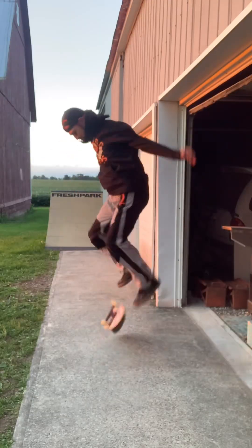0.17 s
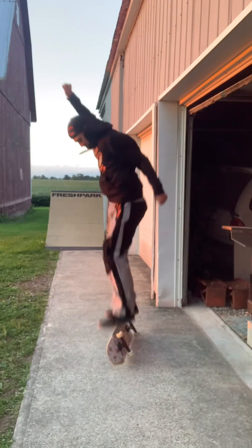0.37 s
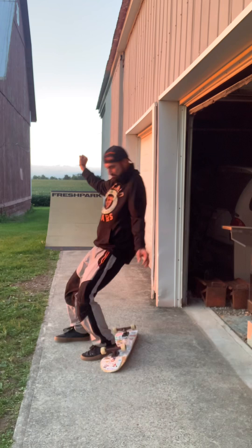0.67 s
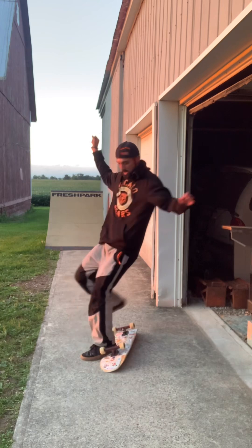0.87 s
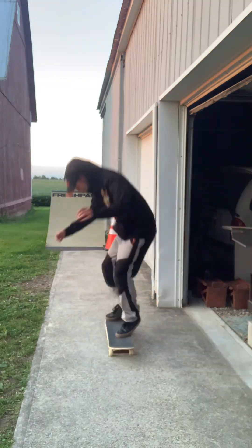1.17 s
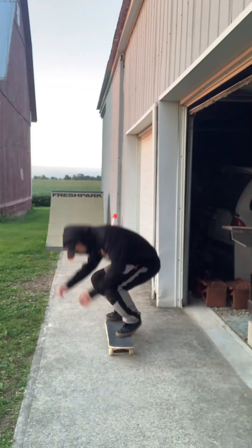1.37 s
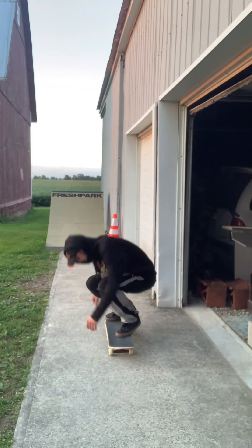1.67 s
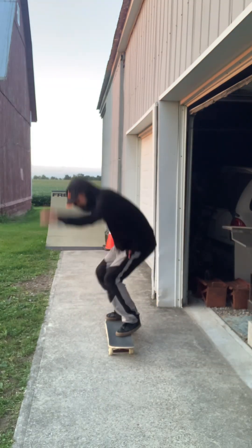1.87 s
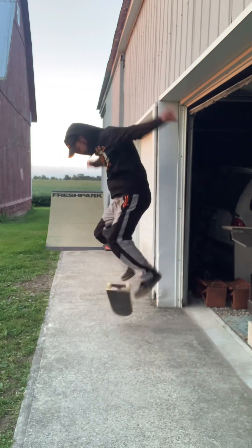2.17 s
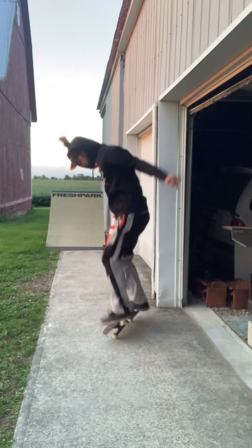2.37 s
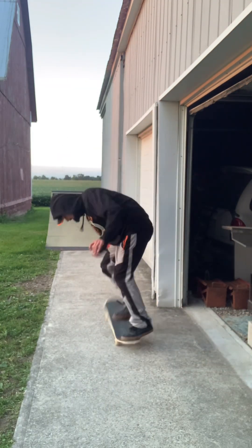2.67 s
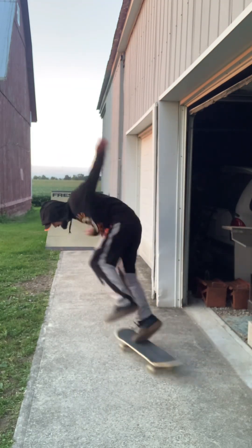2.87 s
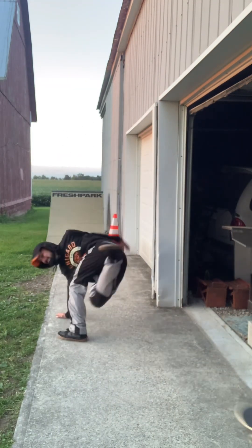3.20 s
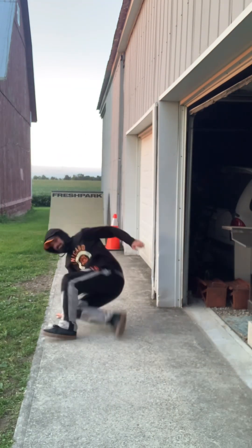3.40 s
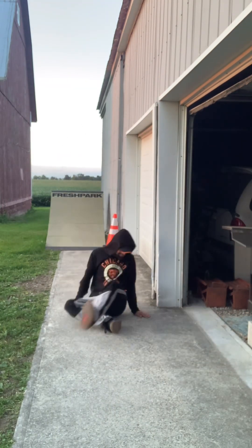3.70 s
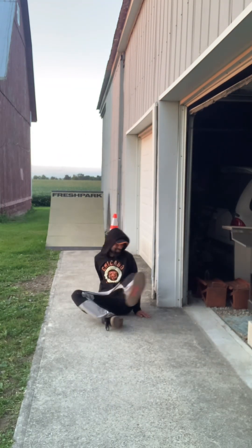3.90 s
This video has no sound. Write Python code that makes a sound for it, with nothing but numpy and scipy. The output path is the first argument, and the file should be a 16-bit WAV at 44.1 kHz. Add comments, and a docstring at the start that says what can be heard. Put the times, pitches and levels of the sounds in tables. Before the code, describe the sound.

Two skateboard flip attempts: sharp wooden cracks and clatter on concrete, a pause between, then a scraping skid, body thumps and faint cloth rustle.

```python
"""Skateboard tricks by a garage

A skateboarder tries two flip tricks on concrete: tail pops, scraping shoes, a clattering board, whirring wheels.
The second time the board shoots away and crashes, and the rider tumbles to the ground.
Blows are damped resonances and noise bursts; rolling and rubbing are shaped noise.
The open garage adds a noise tail and a low boom. Levels are relative: later gains and channel colour apply.
"""
import sys
import numpy as np
from scipy import signal
from scipy.fft import rfft, irfft, next_fast_len
from scipy.io import wavfile
from scipy.ndimage import map_coordinates

SR = 44100
rng = np.random.default_rng(int(sys.argv[2]) if len(sys.argv) > 2 else 0)


def transcribe(u):
    """Save the signal u as a 16-bit wav file named by the first command-line argument.

    u: samples, shape (n,) or (channels, n), limited to [-1, 1]; the rate is SR.
    q: integer samples, one column per channel.
    """
    v = np.clip(np.atleast_2d(u).T, -1, 1)
    q = np.round(v * 32767).astype(np.int16)
    wavfile.write(sys.argv[1], SR, q)


N = 178296
T = np.arange(SR // 2) / SR  # clock of one blow, s

# board on concrete: (time [s], level [dB], clack [Hz], deck ring [dB], bright tick [dB], snap [dB], rebound [dB])
CONTACTS = [(0.046, -19, 990, -6, -20.5, -1, -18.5), (0.104, -27, 936, -10.5, -13, -11.5, -21.5),
            (0.314, -13, 874, -3, -17.5, -4, -18.5), (0.346, -14, 797, -23, -17.5, -12, -14.5),
            (0.402, -26.5, 956, -16, -13.5, -11.5, -8.5), (0.464, -23.5, 797, -11.5, -17, -7, -18),
            (0.48, -20.5, 1088, -6.5, -19.5, -6.5, -14), (0.493, -16, 1015, -12, -25, -8, -19.5),
            (0.526, -6, 1043, -8.5, -30.5, -11.5, -15), (0.531, -10.5, 1014, -19.5, -36, -11.5, -20),
            (0.548, -9, 1168, -21, -27, -9.5, -21), (0.607, -32, 1103, -9.5, -23.5, -4, -12.5),
            (0.663, -27.5, 1038, -3.5, -26.5, -14, -10), (0.962, -43.5, 993, -20.5, -23.5, -9.5, -27),
            (1.99, -13.5, 1047, -4, -19.5, 3, -16), (2.064, -29, 1060, 2.5, -14.5, -10, -14),
            (2.294, -20, 960, -1.5, -13, -2, -10), (2.335, -22, 1037, 4.5, -11.5, -13, -0.5),
            (2.362, -23, 1100, -7.5, -13, -19, -8), (2.413, -11, 993, -0.5, -20, -10, -16.5),
            (2.418, -10, 1197, -27, -31, -15, -19.5), (2.425, -4.5, 1086, -26.5, -30.5, -28, -12),
            (2.443, -15.5, 1003, -24, -22, -24, -17), (2.688, -1, 1162, -12, -22.5, -9.5, -13.5),
            (3.033, -31, 906, -5.5, -22, -2.5, -12), (3.060, -26, 995, -5, -38, -21.5, -14),
            (3.167, -32.5, 730, 2.5, -16.5, -8.5, -17.5), (3.221, -20.5, 715, -0.5, -19.5, -11, -14)]
# maple deck with trucks, nominal modes: (frequency [Hz], level [dB], t60 [s])
DECK_MODES = [(352.5, -5, 0.081), (530.6, -1.5, 0.16), (553, -2, 0.15), (721, 0.5, 0.1),
              (755.6, 2.5, 0.072), (941, -6, 0.13), (1060, -3, 0.15), (1229, -7, 0.11), (1283, 0.5, 0.088),
              (1570, -9, 0.08), (1822, -11, 0.12)]
# loose-truck rattle: (frequency [Hz], level [dB per Hz])
RATTLE_SPECTRUM = [(100, -35), (320, -1), (600, -18), (850, 0.5), (1150, -4), (1700, -9), (2300, -23),
                   (3200, -40), (5000, -38), (9000, -25.5), (13000, -53)]
# hard contact tick: (frequency [Hz], level [dB per Hz])
TICK_SPECTRUM = [(1000, -24.5), (2000, -29), (3200, -23.5), (5000, -21.5), (6500, -8.5), (8500, 3.5),
                 (10000, -8.5), (13000, -17.5)]
REBOUND_DELAY_S, REBOUND_RISE_S, REBOUND_PITCH_RATIO = 0.007, 0.0066, 0.475
SNAP_LEAD_S, SNAP_RISE_S, SNAP_PITCH_RATIO = 0.0039, 0.00093, 1.504
RATTLE_DB, RATTLE_DB_PER_DB = -9.5, 0.83  # level at a 0 dB blow, gain per dB of blow
MAX_DETUNE_RATIO = 0.025  # feet and ground shift each mode
MODE_SPREAD_DB = 4.36  # standard deviation


def deck_ring():
    """Deck modes ring in shares set by the spot struck, detuned by feet and ground."""
    count = len(DECK_MODES)
    strengths = amp(rng.normal(0, MODE_SPREAD_DB, count)) * rng.choice([-1, 1], count)
    loads = 1 + MAX_DETUNE_RATIO * rng.uniform(-0.63, 1, count)
    ring = np.zeros((2, len(T)))
    for strength, load, (hz, level_db, t60_s) in zip(strengths, loads, DECK_MODES):
        ring += strength * amp(level_db) * fade(t60_s, 0.012) * tone(hz * load)
    return ring


def board():
    """Each contact: tick and stiff high snap, wood-urethane clack, deck ring, truck rattle, flex-back rebound."""
    out = np.zeros((2, N))
    for s, db, hz, ring_db, tick_db, snap_db, rebound_db in CONTACTS:
        clack = amp(2.0) * knock(hz, rise_s=0.0026)
        ring = amp(ring_db - 1.5) * deck_ring()
        rattle_gain = amp(RATTLE_DB + RATTLE_DB_PER_DB * db)
        rattle = rattle_gain * fade(0.061, 0.0014) * noise(RATTLE_SPECTRUM, len(T))
        tick_envelope = amp(7.5) * fade(0.0059, 0.0003) + amp(-6.5) * fade(0.15, 0.002)
        tick = amp(tick_db + 6.5) * tick_envelope * noise(TICK_SPECTRUM, len(T))
        # soft noise swell leading into the knock
        lead_in = amp(-14.5) * fade(0.013, 0.0048) * noise(RATTLE_SPECTRUM, len(T))
        snap = amp(snap_db) * knock(SNAP_PITCH_RATIO * hz, SNAP_RISE_S)
        rebound = amp(rebound_db) * knock(REBOUND_PITCH_RATIO * hz, REBOUND_RISE_S)
        add(out, s - 0.001, amp(db) * (clack + ring) + rattle)
        add(out, s - SNAP_LEAD_S, amp(db) * (tick + snap))
        add(out, s - 0.007, amp(db) * lead_in)
        add(out, s + REBOUND_DELAY_S, amp(db) * rebound)
    return out


# hard slams of the board: (time [s], level [dB], garage send relative to crack [dB])
SLAMS = [(.343, -25, 6), (.523, -6.5, -11.5), (.547, -17.5, -1), (1.985, -29, -41), (2.407, -18.5, -8.5),
         (3.266, -20, -1.5), (3.367, -23.5, -11.5), (3.4, -23.5, 0.5)]
# slam noise: (frequency [Hz], level [dB per Hz])
SLAM_SPECTRUM = [(150, -24.5), (270, -4.5), (350, 3.5), (520, -1), (800, 4.5), (1150, 4), (1500, -5),
                 (2300, -10), (3200, -17), (4800, -25), (7000, -20.5), (9000, -33.5), (12000, -71.5)]
# steel and aluminium truck modes: (frequency [Hz], level [dB])
TRUCK_MODES = [(2035, -6), (2528, 2), (2760, -5), (3176, -16)]


def slams():
    """Slams: broad crack, dense dying rattle, thin metal ring; returns direct sound and garage send."""
    direct, send = np.zeros((2, N)), np.zeros((2, N))
    for s, db, send_db in SLAMS:
        envelope = fade(0.12, 0.0015) + amp(-24) * fade(0.55, 0.015)
        crack = amp(db) * envelope * noise(SLAM_SPECTRUM, len(T))
        modes = sum(amp(level_db) * tone(hz) for hz, level_db in TRUCK_MODES)
        metal = amp(db - 23.0) * fade(0.27, 0.00083) * modes
        add(direct, s, crack + metal)
        add(send, s, amp(send_db) * crack)
    return direct, send


# shoes slide on grip tape or board rolls: (start [s], end [s], scrape level [dB], bearing hiss level [dB])
RUNS = [(0.028, 0.138, -43.5, -64.5), (0.327, 0.405, -35.5, -65), (0.462, 0.627, -34.5, -62),
        (1.972, 2.115, -50.5, -61), (2.114, 2.15, -43, -65.5), (2.294, 2.487, -42, -66),
        (2.806, 3.269, -48, -49)]
# rolling grit: (frequency [Hz], level [dB per Hz])
WHEEL_SPECTRUM = [(200, -14), (400, -13.5), (540, -4.5), (650, -13), (800, -2.5), (1180, 1.5),
                  (1430, -11.5), (1950, -14.5), (2400, -24.5), (7000, -46)]
# bearing hiss: (frequency [Hz], level [dB per Hz])
BEARING_SPECTRUM = [(5000, -27.5), (7000, -31), (8300, 1.5), (9000, -1), (10000, -11.5), (13000, -36.5)]
# crushed grit: (frequency [Hz], level [dB per Hz])
GRIT_SPECTRUM = [(900, -6.5), (1700, 3.5), (2500, -7), (3300, -20), (7000, -9.5), (10000, -41.5)]
SCRAPE_RISE_DB_PER_S, SCRAPE_FALL_DB_PER_S = 795, 290
HISS_RISE_DB_PER_S, HISS_COAST_DB_PER_S = 313, 121
# kicked-out board skids past: closest moment, time held near it, level there
SKID_S, SKID_HOLD_S, SKID_DB = 2.841, 0.046, -32.5
SKID_RISE_DB_PER_S, SKID_FALL_DB_PER_S = 162, 86
CHATTER_DB = -10.5


def deck_response(f):
    """Resonant response of the deck modes to continuous shaking."""
    return sum(amp(db) / (1 + 1j * (f - hz) * t60_s * 1.1) for hz, db, t60_s in DECK_MODES)


def wheels():
    """Grit under wheels and shoes shakes the deck in dense tiny blows; bearings hiss and coast on."""
    scrape_rows = [(start, end, db) for start, end, db, _ in RUNS]
    hiss_rows = [(start, end, db) for start, end, _, db in RUNS]
    skid_rows = [(SKID_S - SKID_HOLD_S / 2, SKID_S + SKID_HOLD_S / 2, SKID_DB)]
    runs = strokes(scrape_rows, SCRAPE_RISE_DB_PER_S, SCRAPE_FALL_DB_PER_S)
    skid = strokes(skid_rows, SKID_RISE_DB_PER_S, SKID_FALL_DB_PER_S)
    scrape = np.maximum(runs, skid)
    spin = strokes(hiss_rows, HISS_RISE_DB_PER_S, HISS_COAST_DB_PER_S)
    clumps = np.repeat(rng.uniform(-1.7, 1.7, N // 48 + 1), 48)[:N]  # held for 48 samples
    grains = rng.standard_normal((2, N)) * amp(3.2 * clumps)
    rough = spread(grains, WHEEL_SPECTRUM)
    rolling = amp(1.0 + 2.5 * wobble(per_s=79)) * rough
    rolling += amp(-2.5) * unit(filtered(rough, deck_response))
    rolling += amp(CHATTER_DB) * chatter()
    pressure = np.clip(amp(34) * scrape, 0, 1) ** 2  # harder pressure crushes grit: brighter
    crunch = amp(-5) * pressure * spread(grains, GRIT_SPECTRUM)
    bearings = spin * amp(3.3 * clumps + 7.5) * noise(BEARING_SPECTRUM, N)
    return scrape * (rolling + crunch) + bearings


# knock pitches of the running board: (frequency [Hz])
CHATTER_HZ = [615, 900, 1150, 1720]
CHATTER_PER_S = 110  # mean rate at each pitch


def chatter():
    """Wheels and loose trucks jump on rough concrete: random uneven small knocks, rms 1."""
    out = np.zeros((2, N))
    for hz in CHATTER_HZ:
        jumps = (rng.random(N) < CHATTER_PER_S / SR) * amp(15 * rng.uniform(-1, 1, N))
        out += signal.fftconvolve(jumps[None], knock(hz, rise_s=1.0 / hz), axes=1)[:, :N]
    return unit(out)


# shoes and hands strike concrete: (time [s], level [dB], knock [Hz], slap [dB])
HEELS = [(3.263, -20.5, 877, -4), (3.274, -20.5, 379, -1.5), (3.368, -20.5, 377, -4.5),
         (3.402, -18, 551, -8), (3.762, -16.5, 507, -21.5)]
# soft low thuds of feet, weight shifts and the falling body: (time [s], level [dB], thump [Hz], slap [dB])
THUDS = [(1.69, -44, 169, -26), (1.833, -36, 129, -21), (2.343, -26, 170, -18), (2.488, -26, 68.1, -25.5),
         (2.608, -27.5, 125, -19), (3.224, -23, 151, -20), (3.282, -13, 194, -13), (3.292, -12, 181, -11.5),
         (3.323, -18.5, 142, -9.5), (3.38, -16.5, 99.6, -9), (3.502, -20, 153, -23),
         (3.538, -20, 126.6, -19), (3.644, -21.5, 99, -42), (3.699, -18.5, 77.6, -28.5),
         (3.928, -24.5, 128, -12)]
HEEL_SNAP_DB, HEEL_SNAP_PITCH_RATIO = -11.5, 2.05
SOLE_DB, SOLE_PITCH_RATIO = -8, 1.368  # second resonance of the sole
WEIGHT_NOMINAL_HZ, WEIGHT_LAG_S, WEIGHT_DB = 191.8, 0.01058, -0.5


def tumble():
    """Heels and hands knock at two close pitches, limb weight just behind; soft low thuds; all carry a slap."""
    out = np.zeros((2, N))
    for s, db, hz, slap_db in HEELS:
        snap = amp(HEEL_SNAP_DB) * knock(HEEL_SNAP_PITCH_RATIO * hz, rise_s=0.0029)
        sole = knock(hz, rise_s=0.0055)
        sole = sole + amp(SOLE_DB) * knock(SOLE_PITCH_RATIO * hz, rise_s=0.0039)
        weight = thump(WEIGHT_NOMINAL_HZ * rng.uniform(0.8, 1.07))
        add(out, s - 0.001, amp(db) * (snap + sole + amp(slap_db + 7.0) * slap()))
        add(out, s + WEIGHT_LAG_S, amp(db + WEIGHT_DB) * weight)
    for s, db, hz, slap_db in THUDS:
        add(out, s, amp(db) * (thump(hz) + amp(slap_db + 6.5) * slap()))
    return out


def thump(hz):
    """Soft blow of a few cycles; the deeper, the slower it swells."""
    return knock(hz, rise_s=0.0028 + 0.47 / hz)


# sole, skin or cloth smack: (frequency [Hz], level [dB per Hz])
SLAP_SPECTRUM = [(60, -16.5), (250, 4), (750, -1), (1100, -6), (1600, -15), (4000, -33), (8000, -20.5),
                 (10500, -82)]


def slap():
    """Short noise smack of sole, skin or cloth."""
    return fade(0.11, 0.0043) * noise(SLAP_SPECTRUM, len(T))


# clothes drag on concrete: (start [s], end [s], level [dB])
DRAGS = [(3.28, 3.3, -40.5), (3.45, 3.62, -50), (3.92, 4.04, -48.5)]
# cloth rub: (frequency [Hz], level [dB per Hz])
CLOTH_SPECTRUM = [(200, 7.5), (700, -4.5), (1700, -6), (5000, -24), (8500, -29), (13000, -81)]
DRAG_RISE_DB_PER_S, DRAG_FALL_DB_PER_S = 113, 39


def clothes():
    """Clothes rub on the concrete as the rider rolls over and sits up: wavering noise strokes."""
    drags = strokes(DRAGS, DRAG_RISE_DB_PER_S, DRAG_FALL_DB_PER_S)
    return amp(11.0 + wobble(per_s=24)) * drags * noise(CLOTH_SPECTRUM, N)


# rider jumps, lands, steps, falls: (time [s], boom level [dB], shudder level [dB])
JOLTS = [(0.045, -40.5, -68), (0.322, -32, -37.5), (0.526, -38, -36), (1.15, -41, -51.5),
         (1.669, -41.5, -41), (2.0, -32.5, -42), (2.33, -26.5, -31.5), (2.417, -23.5, -32.5),
         (3.11, -24, -43), (3.263, -20, -20)]
# lowest garage resonance: (frequency [Hz], level [dB per Hz])
BOOM_SPECTRUM = [(20, -25.5), (40, -3), (56, 19), (68, 7.5), (130, -45)]
# shudder above the boom: (frequency [Hz], level [dB per Hz])
SHUDDER_SPECTRUM = [(60, -18), (85, 3.5), (104, 2), (140, -4), (188, -1.5), (255, -13.5), (365, -19),
                    (450, -26), (650, -61.5)]
BOOM_RISE_S, BOOM_T60_S, BOOM_REST_DB = 0.07, 1.51, -59
SHUDDER_RISE_S, SHUDDER_T60_S, SHUDDER_REST_DB = 0.012, 1, -56.5


def rumble():
    """Each jolt of the rider's weight feeds the lowest garage resonance and a quicker shudder above it."""
    boom = shaken([(s, db) for s, db, _ in JOLTS], BOOM_RISE_S, BOOM_T60_S, BOOM_REST_DB)
    shudder = shaken([(s, db) for s, _, db in JOLTS], SHUDDER_RISE_S, SHUDDER_T60_S, SHUDDER_REST_DB)
    boom = boom * drone(BOOM_SPECTRUM, unevenness=2.2)
    return boom + shudder * drone(SHUDDER_SPECTRUM, unevenness=0.98)


def shaken(rows, rise_s, t60_s, rest_db):
    """Gain of a resonance fed by jolts: energies build up, add and decay to a resting level."""
    energy = amp(rest_db) ** 2
    for s, db in rows:
        age = np.maximum(np.arange(N) / SR - s, 0)
        swell = amp(db) * (1 - np.exp(-age / rise_s)) * np.exp(-np.log(1000) * age / t60_s)
        energy = energy + swell ** 2
    return np.sqrt(energy)


def drone(spectrum, unevenness):
    """Narrow low noise with its swells evened out, as a struck wall rings."""
    z = signal.hilbert(noise(spectrum, N)[0])
    return unit(z.real / (np.abs(z) + unevenness))


# garage decay: (frequency [Hz], t60 [s])
GARAGE_T60 = [(100, 1.7), (500, 0.77), (3000, 1.4), (6000, 1.1), (10000, 0.93)]
# garage tail colour: (frequency [Hz], gain [dB])
GARAGE_COLOUR = [(60, 14.5), (300, -2), (1000, -9), (4000, -4.5), (7000, 2.5), (8500, -9), (13000, -24)]


def garage(x):
    """Open garage: convolution with a noise tail that decays at its own speed in each band."""
    source = noise([(100, 0.0063), (10000, 0.0099)], 3 * SR // 2)  # virtually white
    hz, t, z = signal.stft(source, SR, nperseg=256)
    decay = np.exp(-np.log(1000) * t / along(GARAGE_T60, hz)[:, None])
    build_up = 1 - np.exp(-t / 0.015)
    tail = signal.istft(z * decay * build_up, SR, nperseg=256)[1]
    wet = signal.fftconvolve(x[:1], tail / np.linalg.norm(tail[0]), axes=1)[:, :N]
    return filtered(wet, lambda f: amp(along(GARAGE_COLOUR, f)))


# outdoor air: (frequency [Hz], level [dB per Hz])
AIR_SPECTRUM = [(350, -5.5), (520, -5), (900, -1), (1300, -10), (1700, -5.5), (2200, -23.5), (9000, -18.5),
                (13000, -18)]
AIR_DB = -59.5


def air():
    """Faint steady outdoor air: coloured noise."""
    return amp(AIR_DB) * noise(AIR_SPECTRUM, N)


def amp(db):
    """Decibels to gain."""
    return 10 ** (np.asarray(db) / 20)


def unit(x):
    """Scale to rms 1."""
    return x / np.sqrt(np.mean(x ** 2) + 1e-20)


def along(points, hz):
    """Read (frequency, value) points on a log-frequency axis."""
    f, v = np.transpose(points)
    return np.interp(np.log(hz + 1), np.log(f + 1), v)


def filtered(x, response):
    """Apply a frequency response."""
    n = x.shape[-1]
    m = next_fast_len(n + 8192)
    return irfft(rfft(x, m) * response(np.fft.rfftfreq(m, 1 / SR)), m)[..., :n]


# channel likeness: (frequency [Hz], correlation [0..1])
ALIKE = [(600, 1), (800, 0.98), (1300, 0.55), (8800, 1), (10000, .1)]


def half_angle(hz):
    """Likeness of the channels as half a phase angle, rad."""
    return np.arccos(np.clip(along(ALIKE, hz), -1, 1)) / 2


def spread(pair, spectrum):
    """Colour two unrelated signals into a stereo pair of rms 1 with frequency-dependent likeness."""
    def response(hz):
        return amp(along(spectrum, hz)) * [np.cos(half_angle(hz)), np.sin(half_angle(hz))]
    mid, side = filtered(pair, response)
    return unit(np.array([mid + side, mid - side]))


def tone(hz):
    """Stereo sine whose channel phase gap follows the likeness at its pitch."""
    apart = half_angle(hz) * rng.choice([-1, 1])
    return np.sin(2 * np.pi * hz * T + np.array([[apart], [-apart]]))


def noise(spectrum, size):
    """Coloured stereo noise, rms 1."""
    return spread(rng.standard_normal((2, size)), spectrum)


def fade(t60_s, attack_s):
    """Quick rise, exponential decay."""
    return np.exp(-np.log(1000) * T / t60_s) * (1 - np.exp(-T / attack_s))


def knock(hz, rise_s):
    """Heavily damped resonance that swells and dies within a few cycles."""
    u = T / max(rise_s, 1e-4)
    return u ** 2 * np.exp(2 - 2 * u) * tone(hz)


def strokes(rows, rise_db_per_s, fall_db_per_s):
    """Gain of (start, end, dB) strokes: swell, hold, die away; the loudest prevails."""
    t = np.arange(N) / SR
    levels_db = []
    for start, end, db in rows:
        before, after = np.maximum(start - t, 0), np.maximum(t - end, 0)
        levels_db.append(db - rise_db_per_s * before - fall_db_per_s * after)
    return amp(np.max(levels_db, axis=0))


def wobble(per_s):
    """Smooth random curve, per_s knots a second."""
    knots = rng.standard_normal(2048)
    return map_coordinates(knots, [np.arange(N) * per_s / SR], mode="mirror")


def add(track, s, sound):
    """Mix a sound into a track at s seconds."""
    start = max(round(s * SR), 0)
    track[:, start:start + sound.shape[-1]] += sound[..., :N - start]


def leftward(x, shade_db):
    """Weaken the right channel above the bass, fully from 900 Hz."""
    return filtered(x, lambda f: amp(np.outer([0, shade_db], along([(650, 0), (900, 1)], f))))


BOARD_SEND_DB, FALL_SEND_DB = -13.5, -8.5  # into the garage


def scene():
    """Board, fall and rumble in front of the garage, over faint air."""
    clatter, fall = board(), tumble()
    crack, send = slams()
    echo = garage(send + amp(BOARD_SEND_DB) * clatter + amp(FALL_SEND_DB) * fall)
    shaded = leftward(crack + fall + echo + clothes(), shade_db=-6.32)
    return clatter + wheels() + rumble() + shaded + air()


# left microphone channel: (frequency [Hz], gain [dB])
LEFT = [(650, -6), (850, -3), (2000, -4), (3200, -4.5), (6300, -14.5), (7800, -23.5), (8050, -6.5),
        (13000, -28.5)]
# right microphone channel: (frequency [Hz], gain [dB])
RIGHT = [(650, -6), (1150, -8), (1700, -3), (3200, -4.5), (6300, -13), (7800, -22.5), (8300, -22.5),
         (10500, -40.5)]
# right channel ahead of left: (frequency [Hz], phase [rad])
RIGHT_LEAD = [(950, 0), (1100, .5), (1420, -2.5), (2000, -1.5), (3200, -2.5), (5300, 1.5), (7700, 10),
              (10000, 14)]
TOP_HZ = 14000


def record(dry):
    """Colour and phase of each microphone channel, peak rounding, band limit."""
    def channels(hz):
        right = amp(along(RIGHT, hz)) * np.exp(1j * along(RIGHT_LEAD, hz))
        return np.array([amp(along(LEFT, hz)), right])
    heard = filtered(dry, channels)
    rounded = heard / (1 + (heard / 0.97) ** 8) ** (1 / 8)
    return filtered(rounded, lambda hz: hz < TOP_HZ)


dry = scene()
out = record(dry)
transcribe(out)
```